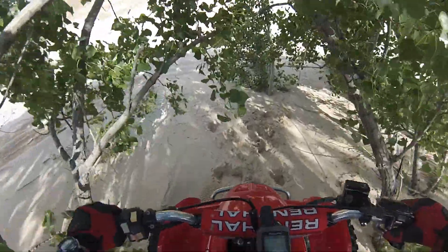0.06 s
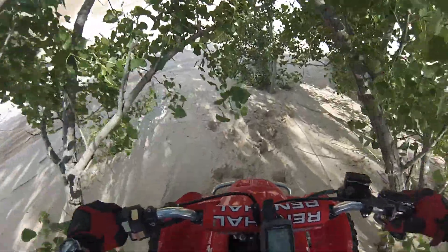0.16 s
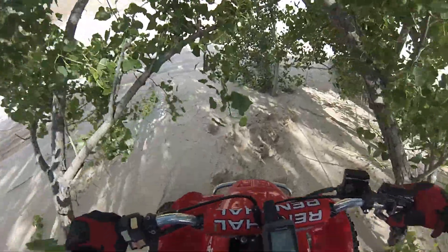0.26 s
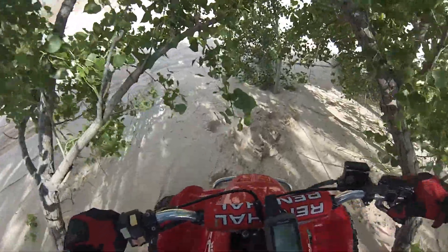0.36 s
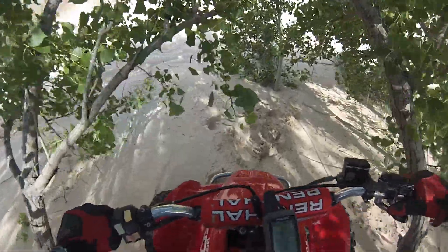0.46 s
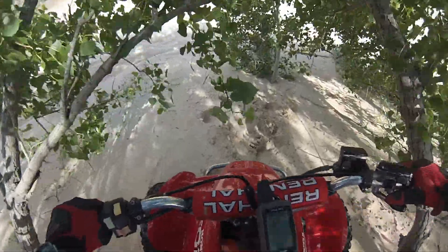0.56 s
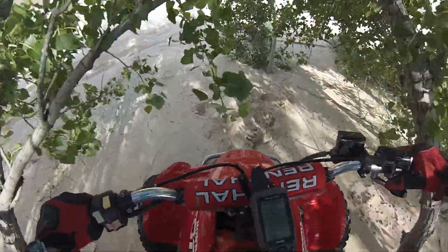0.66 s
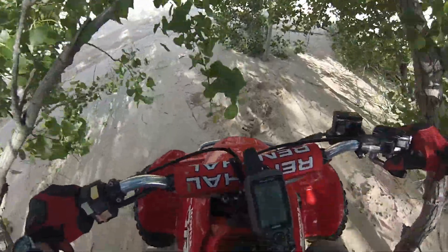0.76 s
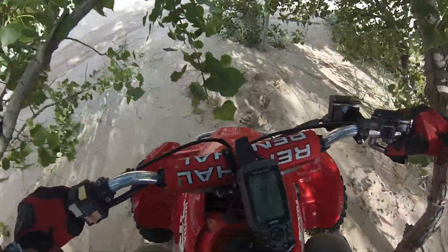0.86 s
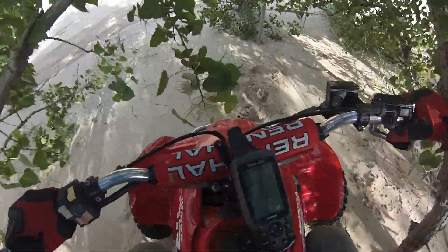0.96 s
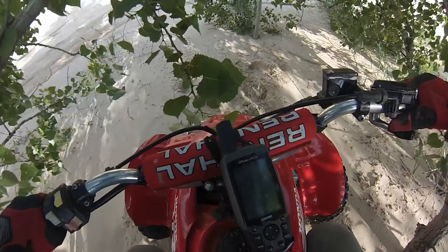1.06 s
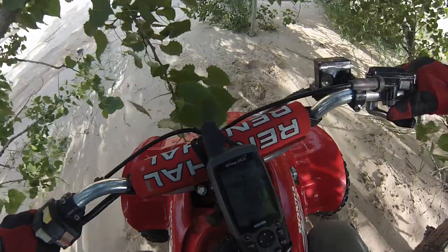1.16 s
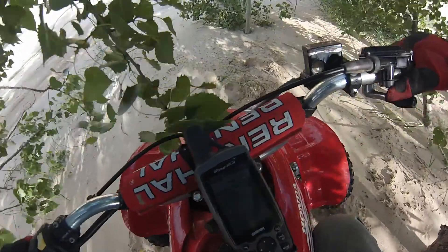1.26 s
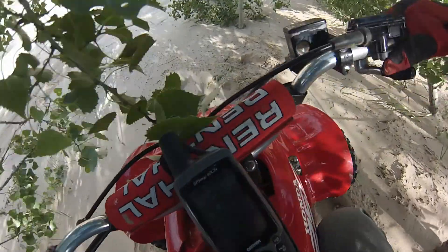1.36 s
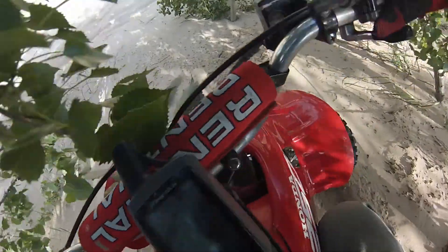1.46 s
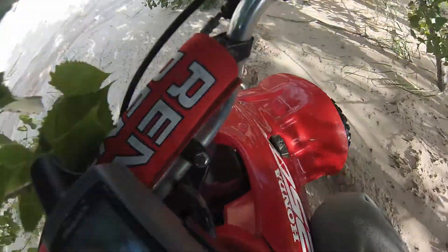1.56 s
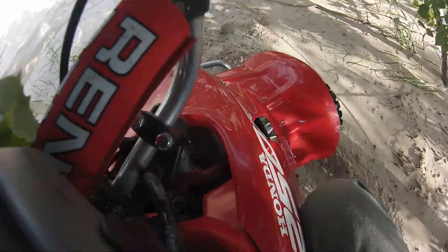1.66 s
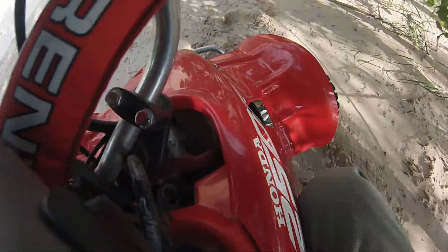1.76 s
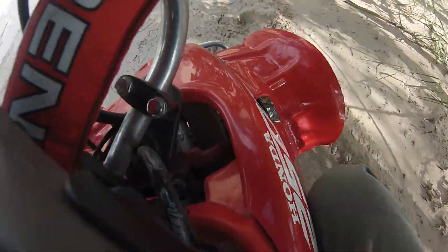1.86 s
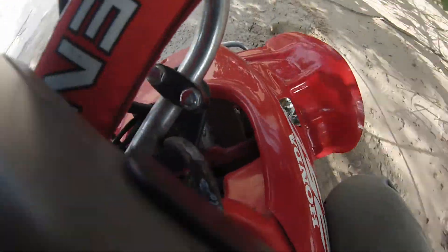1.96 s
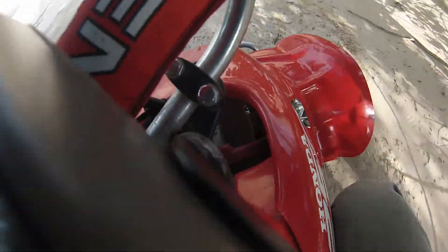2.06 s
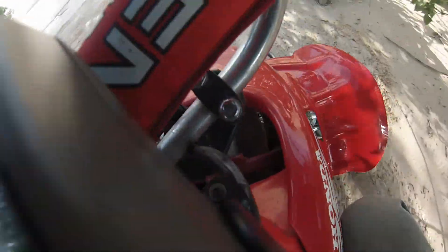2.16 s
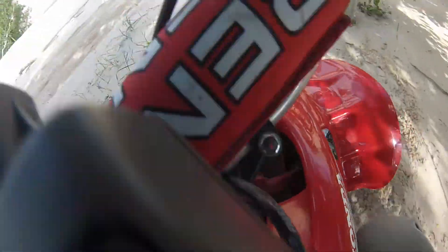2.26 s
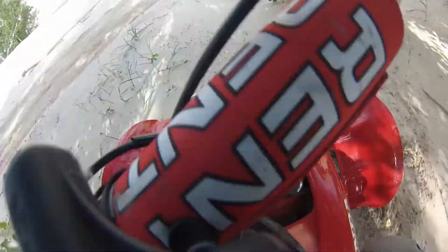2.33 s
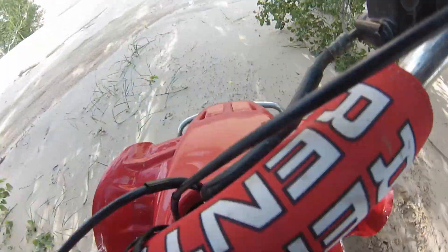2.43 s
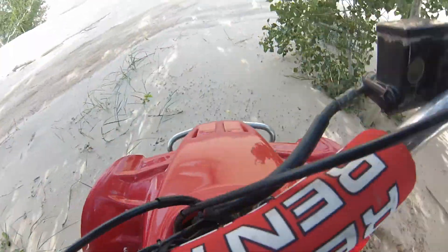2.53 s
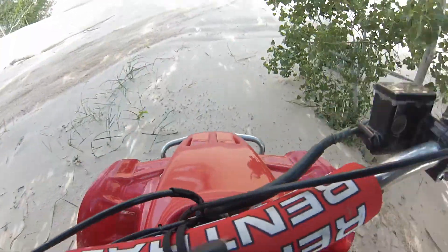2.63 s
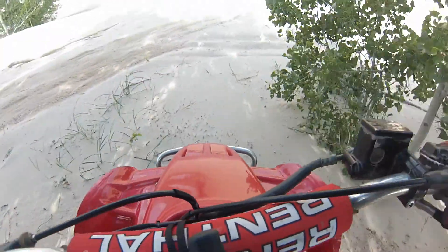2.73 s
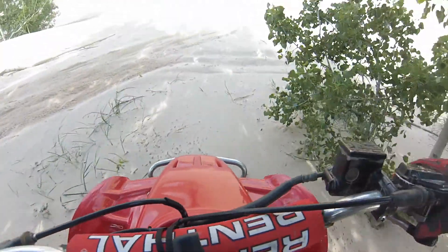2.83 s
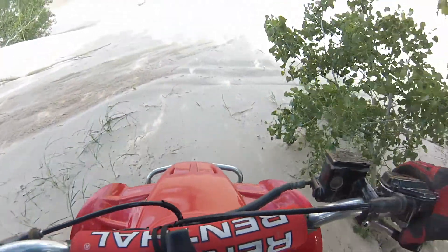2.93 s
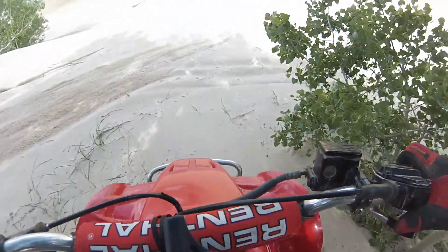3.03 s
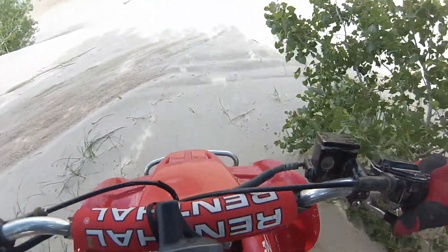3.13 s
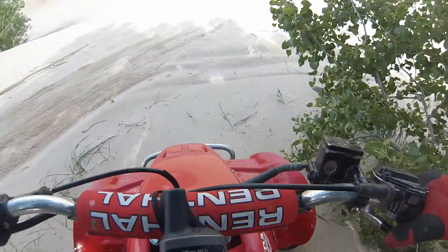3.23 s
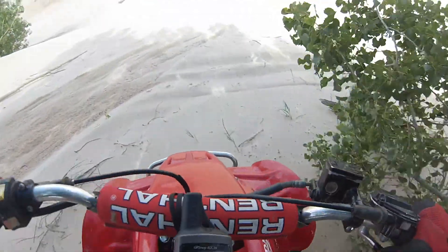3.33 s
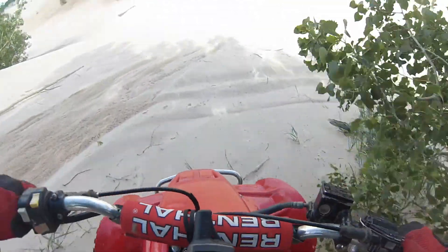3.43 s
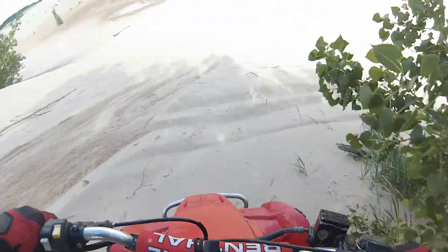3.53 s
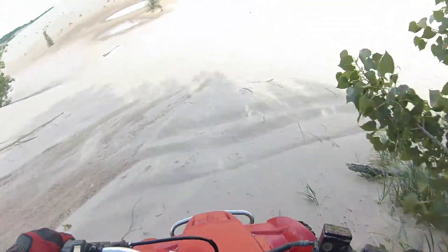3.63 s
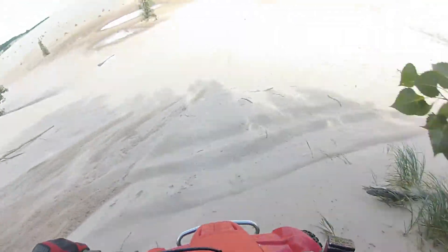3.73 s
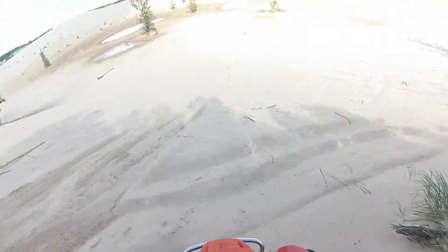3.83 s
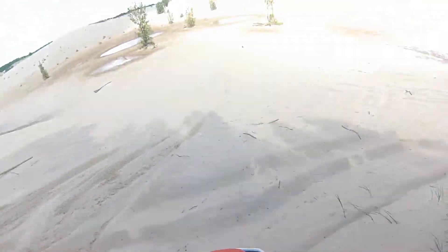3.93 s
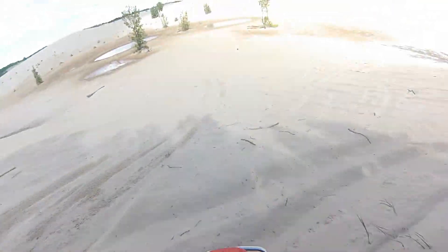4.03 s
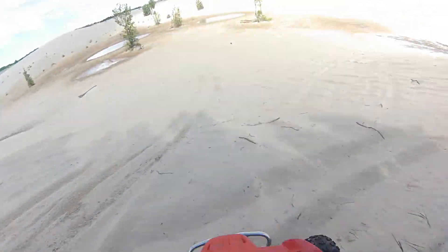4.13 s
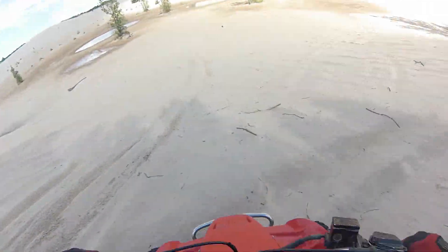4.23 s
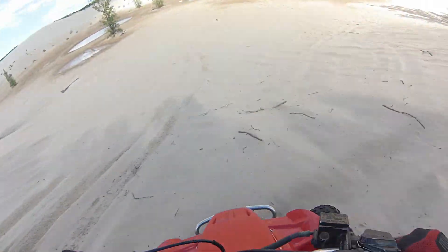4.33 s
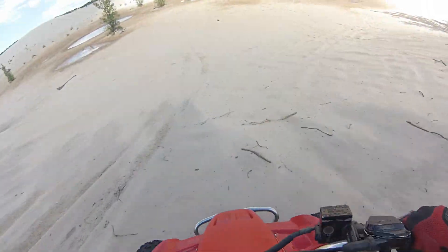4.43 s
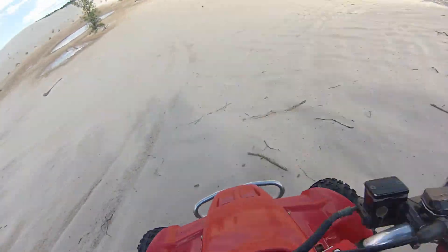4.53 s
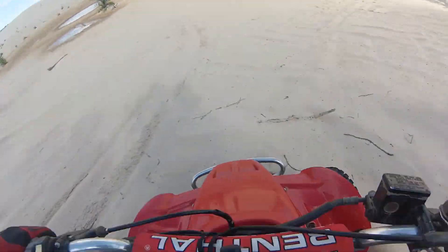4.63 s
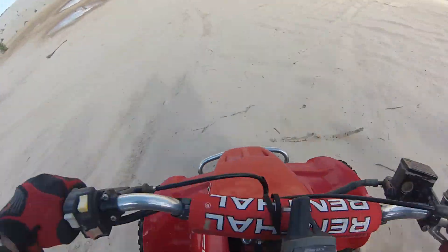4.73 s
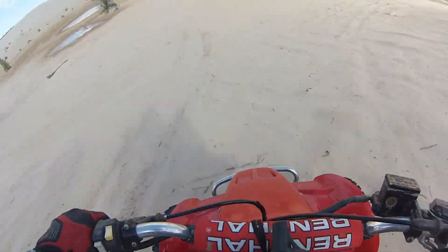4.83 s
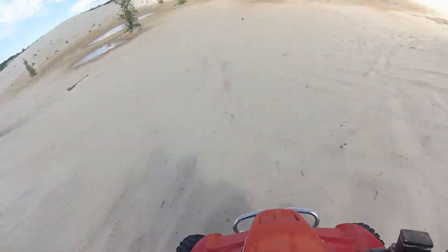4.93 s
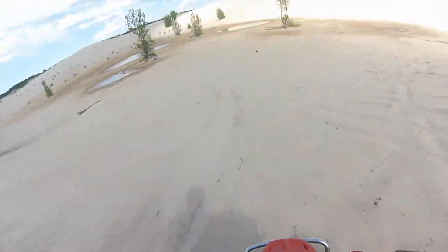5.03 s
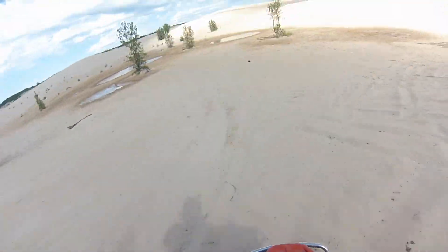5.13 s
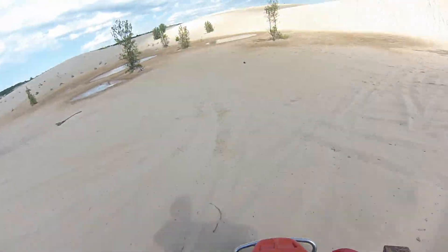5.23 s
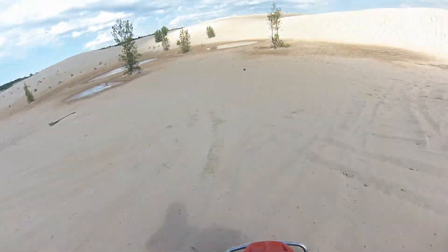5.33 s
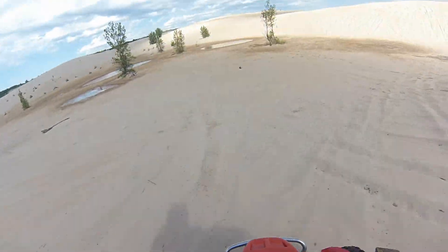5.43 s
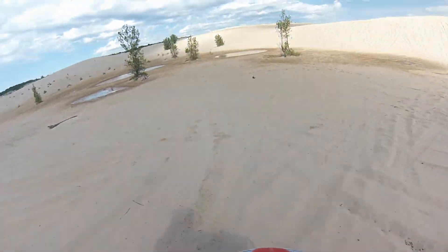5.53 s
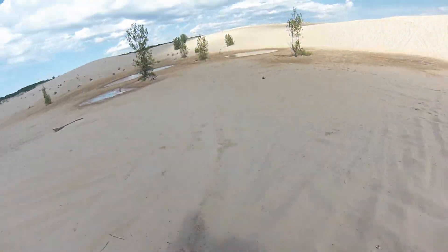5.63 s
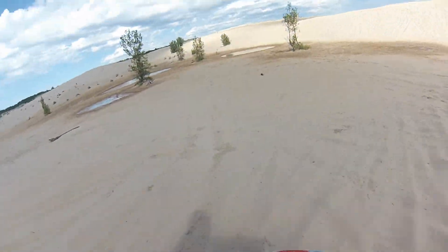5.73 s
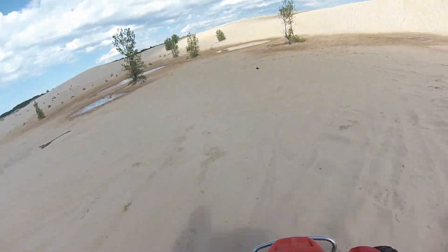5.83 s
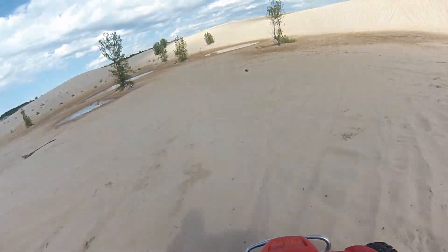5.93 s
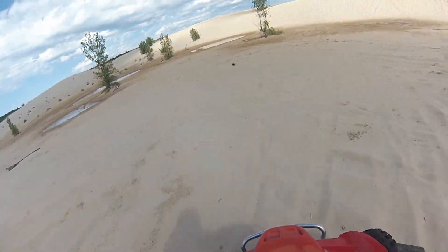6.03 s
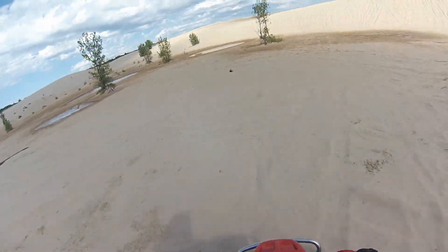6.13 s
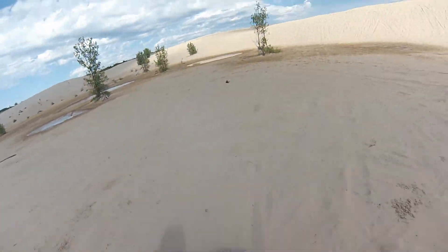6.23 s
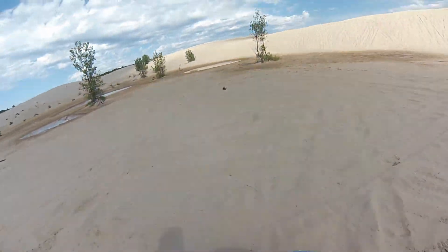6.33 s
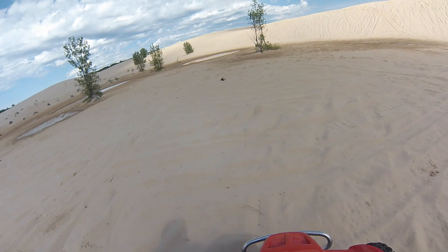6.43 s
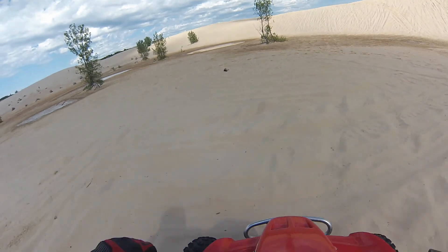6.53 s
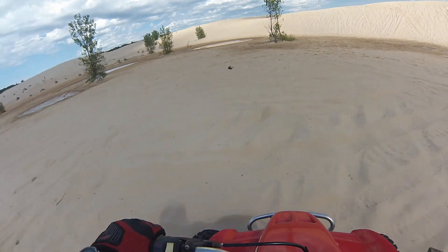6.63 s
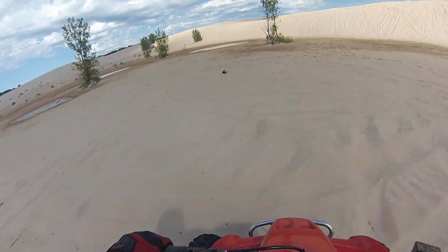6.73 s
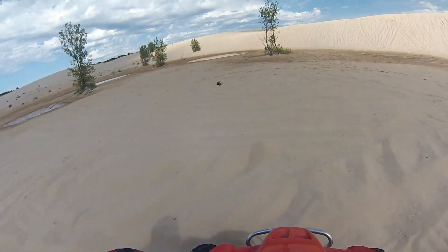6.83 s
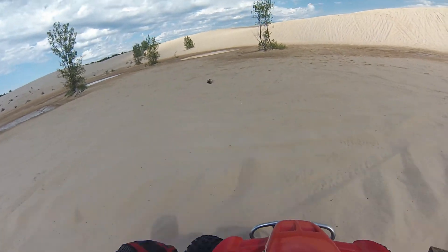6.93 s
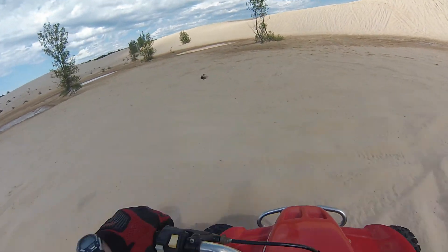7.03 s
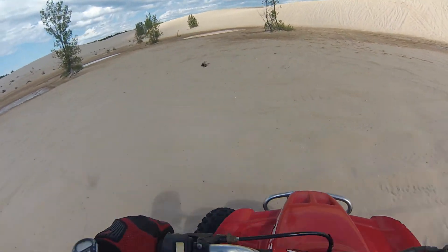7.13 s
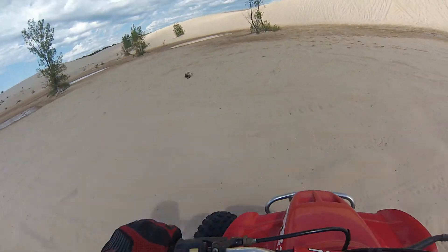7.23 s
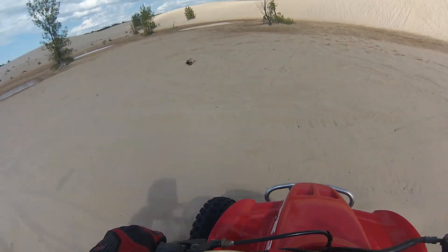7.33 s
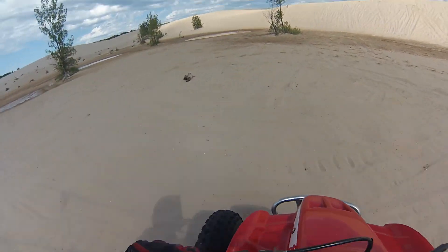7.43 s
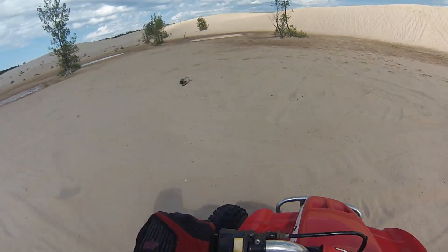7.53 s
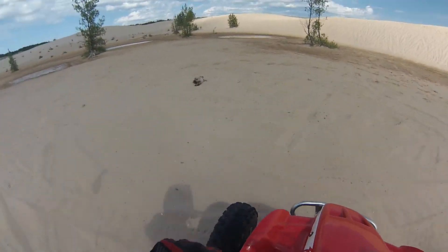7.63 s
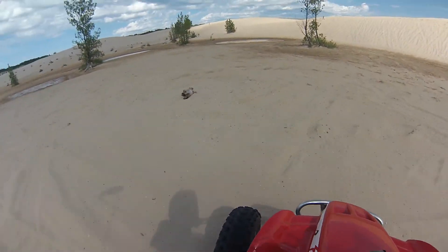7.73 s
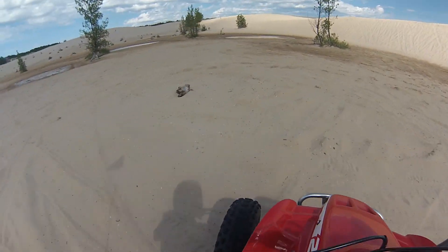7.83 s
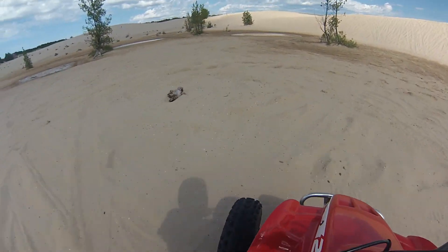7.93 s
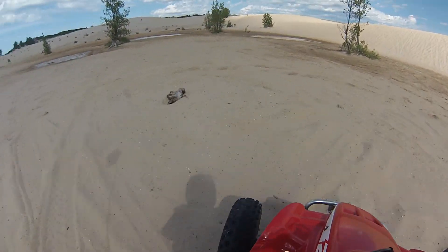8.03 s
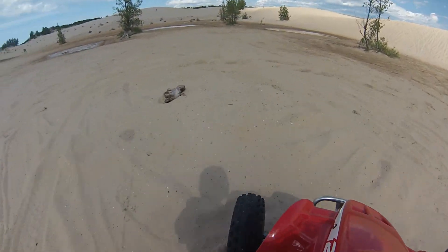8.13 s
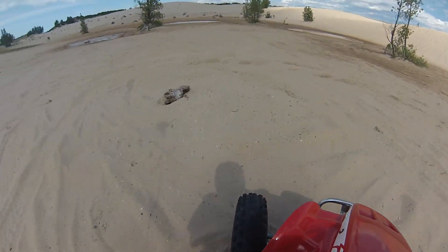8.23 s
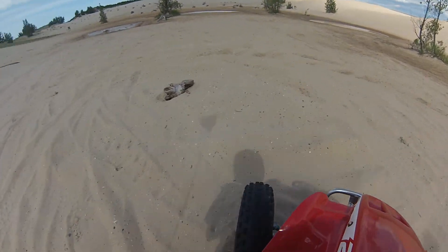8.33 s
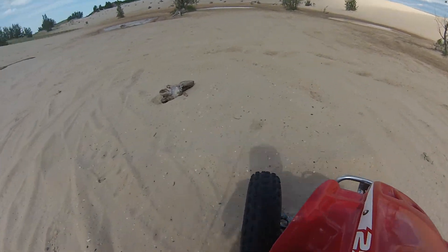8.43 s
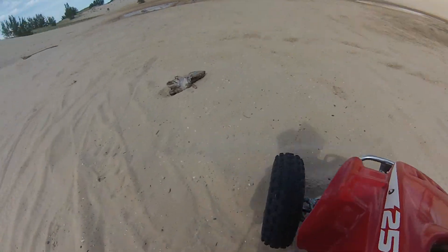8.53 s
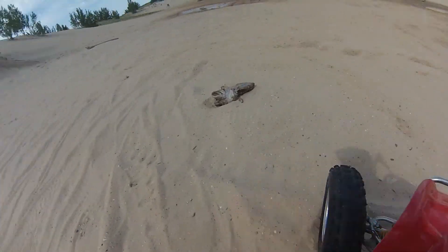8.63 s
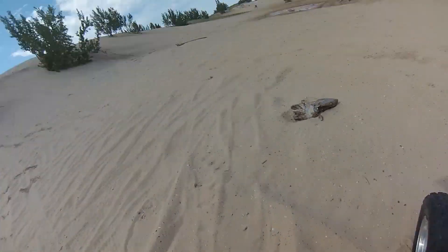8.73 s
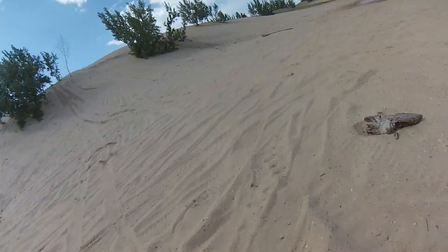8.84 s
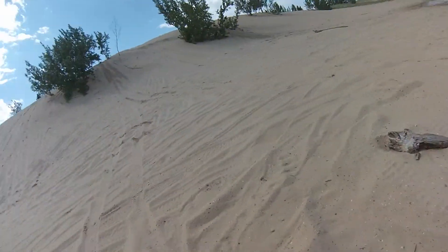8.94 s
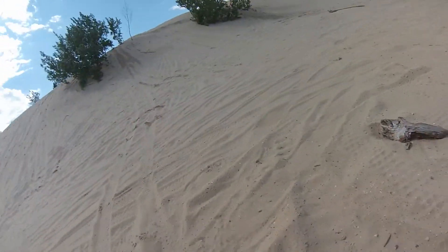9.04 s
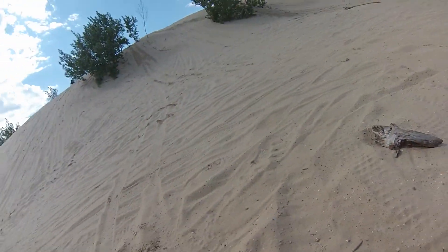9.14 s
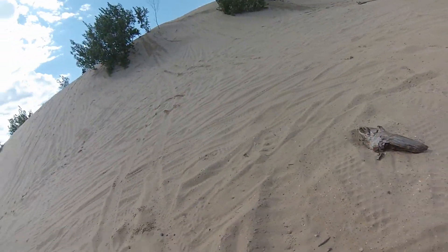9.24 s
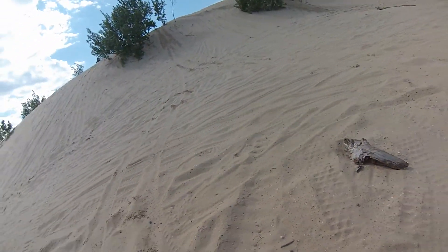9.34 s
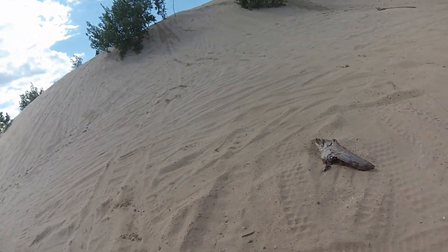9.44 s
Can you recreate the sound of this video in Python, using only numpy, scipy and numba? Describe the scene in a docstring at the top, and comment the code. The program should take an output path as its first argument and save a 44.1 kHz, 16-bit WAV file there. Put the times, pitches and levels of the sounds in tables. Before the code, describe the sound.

A small two-stroke quad idles softly and irregularly, popping and clattering. A heavy knock with juddering rubs and dry scrapes hits the microphone's plastic housing. The engine then climbs to a brief snarling peak, sings down off the throttle, sputters along at middle revs and ends in loud, even, raspy running. Outdoors, wind buffets lowly; the rider-worn microphone sounds close, boxy and self-ducking.

```python
"""Small quad bike on sand

A small two-stroke quad bike idles among trees, then is blipped and driven over sand. The microphone rides on the
rider in a closed plastic housing. Each engine turn sends a puff that rings the pipe and housing; turns that fire
add a thump and a crack. Wind noise buffets the housing, short pulses and gliding noise make knocks, rubs and
scrapes, and the recorder's gain control turns the sound down after loud peaks."""
import sys
import numpy as np
from scipy import signal
from scipy.io import wavfile
from scipy.ndimage import uniform_filter1d
from numba import njit

SR = 44100
rng = np.random.default_rng(int(sys.argv[2]) if len(sys.argv) > 2 else 0)


def bounce(signal):
    """Save signal as a 16-bit WAV file at the path given by the first command-line argument."""
    frames = np.transpose(np.atleast_2d(signal))
    limited = np.clip(frames, -1, 1)
    pcm = np.round(limited * 32767).astype(np.int16)
    wavfile.write(sys.argv[1], SR, pcm)


N = 418068
T = np.arange(N) / SR  # time of each sample [s]

# Levels below are relative: the functions add further gains.
# Engine course: (time [s], crank speed before surges [Hz], puff of each turn [dB], rasp of each turn [dB])
ENGINE_COURSE = [(0, 40.53, -34, -39.5), (.7, 41.46, -34.5, -42.5), (1.6, 40.63, -35, -41),
                 (1.9, 42.9, -38.5, -40.5), (2.4, 42.6, -35, -42), (2.7, 42.63, -34.5, -42.5),
                 (3.0, 42.05, -34, -40), (3.3, 41.23, -34, -42), (3.55, 50.27, -34, -40.5),
                 (3.93, 50.94, -32, -39.5), (4.33, 57.2, -32, -40), (4.62, 65.4, -27, -37.5),
                 (4.88, 69.34, -25, -35.5), (5.07, 75.8, -26.5, -32.5), (5.15, 84.6, -19.5, -20),
                 (5.246, 97.5, -12, -16), (5.27, 100.1, -22, -19.5), (5.292, 98, -26, -17),
                 (5.305, 99.2, -45, -26), (5.35, 94.3, -29, -28), (5.5, 89.15, -70, -26),
                 (5.72, 79.4, -32, -29), (5.81, 77.15, -31, -32.5), (5.99, 69.8, -31.5, -37),
                 (6.34, 73.1, -28.5, -35), (6.6, 77.04, -25, -31), (6.82, 71.15, -30, -34),
                 (7.0, 74.1, -28.5, -33), (7.3, 71.4, -29, -34.5), (7.58, 68.94, -30.5, -34),
                 (8.13, 73.25, -28.5, -33), (8.45, 79.8, -28.5, -32.5), (8.62, 62.3, -33, -37.5),
                 (8.79, 49.55, -41, -36), (8.85, 48.7, -24, -24.5), (9.0, 50.42, -23, -20.5),
                 (9.21, 68.1, -19.5, -17), (9.4, 52.77, -23, -21), (9.48, 52.14, -21.5, -20.5)]
# Turns that fire: (time [s], crack [dB], share with which the next turn fires too [0-1])
FIRING_TURNS = [(0.158, -51, 0.5), (0.303, -45, 0), (0.373, -37, 0.16), (0.4995, -44, 0), (0.692, -47, 0),
                (0.781, -38.5, 0), (0.876, -44, 0.1), (0.9295, -41.5, 0), (0.997, -39.5, 0.8),
                (1.1147, -39.5, 0), (1.211, -36, 0.06), (1.351, -44, 0.2), (1.4507, -44, 0.1),
                (1.5397, -42, 0), (1.586, -44, 0), (1.772, -39, 0.4), (1.819, -41, 0.6), (2.4166, -37, 0.2),
                (2.491, -47, 0.6), (2.599, -47, 0.8), (2.634, -47, 0.1), (2.716, -41, 0.2), (2.852, -46, 0),
                (2.9498, -36, 0.2), (3.0465, -44, 0.1), (3.137, -39.5, 0), (3.28, -34.5, 0.13),
                (3.494, -32.5, 0), (3.543, -31, 0), (3.579, -31.5, 0), (3.723, -31, 1), (3.8012, -26, 0.03),
                (3.88, -27, 0), (3.976, -26, 0), (4.0506, -28, 0), (4.149, -27.5, 0), (4.2173, -29.5, 0),
                (4.2891, -29.5, 0.1), (4.3582, -26.5, 0), (4.41, -27.5, 0.06), (4.46, -27.5, 0),
                (4.509, -26, 0.1), (4.572, -26.5, 0), (4.618, -25, 0.02), (4.664, -24.5, 0.01),
                (4.7102, -26.5, 0.8), (4.771, -24.5, 0.4), (4.827, -28.5, 0.9), (4.8894, -26, 0.46),
                (4.9441, -33, 0), (4.969, -28.5, 0.25), (5.011, -28.5, 0.84), (5.074, -30.5, 0.8),
                (5.116, -31, 0.68), (5.783, -28.5, 0.58), (5.8369, -31, 0.4), (5.877, -33, 0.2),
                (6.006, -34, 0.04), (6.033, -31, 0.75), (6.105, -31.5, 0.9), (6.162, -32, 0.85),
                (6.232, -29.5, 0.1), (6.26, -34, 0), (6.302, -28, 0.02), (6.332, -30.5, 0.6),
                (6.3857, -31.5, 0.95), (6.438, -29.5, 0.03), (6.4758, -28.5, 0.64), (6.542, -28.5, 0.84),
                (6.611, -27, 0.54), (6.677, -28.5, 0), (6.715, -29, 0), (6.755, -28.5, 0),
                (6.782, -34, 0.92), (6.8245, -29, 0.36), (6.8935, -28.5, 0.67), (6.96, -27.5, 0.2),
                (7, -31.5, 0.85), (7.069, -28, 0.66), (7.138, -31, 0.37), (7.166, -28.5, 0),
                (7.2247, -27, 0.6), (7.294, -25, 0.4), (7.3681, -28.5, 0.6), (7.829, -33.5, 0.3),
                (7.9427, -37.5, 1), (8.055, -31.5, 0.1), (8.1533, -29.5, 0.5), (8.275, -31.5, 1),
                (8.355, -29.5, 0.92), (8.4176, -31, 0.7), (8.469, -31, 0.72), (8.536, -31, 0.86),
                (8.5915, -32, 0.97), (8.6444, -29.5, 0.24), (8.695, -28.5, 0.02), (8.733, -30, 0.43),
                (8.7936, -32.5, 0.7)]
# Even running, without misfires: (start [s], end [s], evenness [0-1])
EVEN_STRETCHES = [(5.11, 5.76, .88), (7.5, 8.3, .6), (8.82, 9.6, .95)]
# Throttle shut at speed, when tones start, are full, begin to fade and end: (time [s])
COAST_TIMES = (5.295, 5.332, 5.62, 5.769)
# Tones while the throttle is shut: (multiple of crank speed, level [dB])
COAST_TONES = [(3, -44), (4, -46), (5, -33.5), (6, -62), (7, -47), (8, -55), (9, -53), (10, -54),
               (11, -45.5), (12, -48), (13, -53), (14, -58), (15, -45), (16, -63)]
# Rings that sing while the throttle is shut: (frequency [Hz], width [Hz], level [dB])
COAST_MODES = [(2690, 53, -1), (3650, 94, -11)]
# Main rings of the pipe: (frequency [Hz], width [Hz], level [dB])
PIPE_MODES = [(292, 28.4, -8.5), (424.1, 34, 5), (496.6, 94, -9)]
# Upper rings of the pipe: (frequency [Hz], width [Hz], level [dB])
PIPE_UPPER_MODES = [(625, 20, -5.5), (831, 180, -10), (1000, 710, -12), (1461, 49, -12)]
# Rings under load or at a firing: (frequency [Hz], width [Hz], level [dB])
BARK_MODES = [(1541, 46, 0.5), (2100, 120, -47), (2700, 1350, -20.5), (3120, 156, -7), (2670, 59, -7.5)]
# Low rings under load: (frequency [Hz], width [Hz], level [dB])
LOW_BARK_MODES = [(195, 60, -9), (475, 90, 0), (545, 60, -5)]
# Rings of the plastic housing, the low ones retuned a little: (frequency [Hz], width [Hz], level [dB])
HOUSING_MODES = [(952, 100, -9.5), (1400, 181, -1), (2050, 49, -4), (2285, 280, -8.5), (2675, 80, 0),
                 (3125, 180, -16)]
# Rings of the engine's metal: (frequency [Hz], width [Hz], level [dB])
METAL_MODES = [(3664, 396, 1.5), (4380, 124, 4), (4870, 770, -1.5), (6720, 570, 0), (7720, 640, -4.5),
               (9980, 1800, -13), (11250, 190, -11), (13500, 850, -66)]
# Steady frame vibration: (multiple of crank speed, level [dB])
FRAME_TONES = [(2, -40), (3, -54.5), (4, -58.5), (6, -64)]
# The rider leans and turns, and rings come and go: (time [s], body of the pipe [dB], its upper body [dB],
# ring of the housing [dB], once-a-turn shake of the frame [dB])
RIDER_LEAN = [(0, -15, -16, -2, -57), (1.2, -20, -27, 2, -42), (1.8, 1, -20, -23, -45),
              (2.4, 4, -8, -1, -40), (2.9, 0, -12, 5.5, -41), (3.4, -17, -22, 4, -46),
              (4.2, -28, -23, -15, -44), (5.0, -13.5, -19.5, -8, -45), (5.8, -14, -9, -5, -40),
              (6.6, -16, -17, -11, -34), (7.4, -2, -9, 3, -48), (8.0, -12, -15, -10, -38),
              (8.35, -5, -12, -7, -45), (8.5, -11, -2, -6, -29.5), (8.7, 2, -7, 0, -47),
              (8.85, -7.5, -21, -11, -42), (9.2, -4, -19, -6, -40), (9.48, 0, -24, -8, -41)]
# Knocks on the housing: (time [s], push [dB], signed size of the push and swing, contact time [ms],
# swing of the mount [dB], click [dB])
HOUSING_KNOCKS = [(1.899, 3, 0.99, 0.98, 3.5, 2), (2, -3, 0.51, 4, -25, -46),
                  (2.043, 40, -0.28, 1.65, 13, 8.5), (3.401, -15.5, -0.88, 1.66, -28, -48),
                  (4.157, -30, -0.83, 0.76, -29, -20), (5.704, -50, 0.75, 0.4, -52, -28),
                  (6.389, -14, 0.67, 2.1, -39, -30), (6.874, -44, 0.99, 0.34, -58, -18.5),
                  (7.266, -56, 0.89, 0.694, -50, -44), (7.434, 14, 0.27, 6.3, 1.5, -24),
                  (7.538, -62, 1, 1.2, -70, -23), (7.89, -46, 1, 0.64, -65, -31),
                  (9.041, 10, 0.066, 2.7, 12.5, -15)]
# Swing of the mount after a knock: (frequency [Hz], level [dB], time to fall by 60 dB [s])
MOUNT_MODES = [(65.4, 6.5, 0.36), (99, -32, 0.5), (182.3, 3, 0.14), (41, -11.5, 0.9)]
# Rings of the shell after a knock: (frequency [Hz], width [Hz], level [dB])
SHELL_MODES = [(950, 133, 6.5), (1470, 43, -1), (2320, 150, 5.5), (1900, 1200, -2)]
# Rubbing on the housing: (start [s], length [s], judder [dB], judder rate [Hz], scrape relative to judder [dB])
HOUSING_RUBS = [(1.606, 0.042, -23, 114, -35), (1.647, 0.069, -23.5, 108.4, -23),
                (2.055, 0.062, 0, 117.1, -31.5), (2.123, 0.1, -2, 128, -29.5),
                (2.216, 0.068, -1.5, 124, -28.5), (3.385, 0.087, -22.5, 108.4, -30),
                (9.031, 0.038, -13.5, 108.3, -40)]
# Dry scrapes on the shell: (start [s], length [s], level [dB], pitch [Hz], end pitch [Hz], width [Hz])
SHELL_SCRAPES = [(1.619, 0.016, -38.5, 1260, 980, 500), (1.668, 0.034, -38.5, 960, 1100, 700),
                 (1.713, 0.016, -42, 1010, 990, 600), (2.135, 0.041, -27.5, 2050, 2050, 160),
                 (2.18, .04, -35, 2070, 2050, 195), (2.212, 0.04, -31, 2120, 2060, 140),
                 (2.243, 0.04, -23.5, 2116, 2260, 262), (3.395, 0.0094, -31, 1080, 920, 343),
                 (3.405, 0.049, -38.5, 1160, 1300, 500), (3.461, 0.03, -44.5, 2240, 2400, 400)]
# Bands within a scrape: (multiple of the pitch, level [dB])
SCRAPE_BANDS = [(.66, -3), (1, 2.5), (1.72, -7.5)]
# Wind: (time [s], buffeting [dB], slow heave relative to it [dB])
WIND_COURSE = [(0, -31, -10), (.7, -35, -9), (1.4, -32.5, -6), (1.75, -31, 0.5), (2.0, -10.5, -8),
               (2.1, 6, 3), (2.35, -21, -6), (2.8, -32.5, 0), (3.2, -30.5, -6), (3.7, -25.5, -10),
               (4.2, -36, 7), (4.4, -23, 3), (4.8, -19.5, -3.5), (5.1, -30.5, 0), (5.4, -25, -3.5),
               (5.75, -21.5, 0.5), (6.1, -25, 3), (6.4, -28, 2.5), (6.9, -23.5, -1), (7.3, -18.5, 3.5),
               (7.6, -27, 7), (7.9, -27.5, 3.5), (8.12, -24, 8.5), (8.3, -31.5, 6.5), (8.5, -24, -0.5),
               (8.9, -30.5, -6.5), (9.15, -24, -2.5), (9.48, -27, -10)]

USUAL_EVENNESS, EVEN_OUT_S = .47, .08
SURGE_SHARE, SURGE_T60_S = 0.03, 0.39  # each firing speeds the crank up, drag takes it back
# the intake gulp is largest at idle speed and dies out as the crank speeds up
IDLE_HZ, MOST_GULP, GULP_ENDS_HZ = 37.9, 0.71, 47
# clatter level at idle, growth with crank speed, growth per dB of rasp
CLATTER_DB, CLATTER_DB_PER_HZ, CLATTER_PER_RASP = -44.5, 0.1812, 0.44
THUMP_DB, THUMP_PER_CRACK = -20, 0.56  # relative thump of a -23.5 dB crack; growth with the crack
AGAIN_THUMP = .6  # a weak second firing still thumps: power of its share
JITTER_S, RASP_SCATTER_DB = .00012, 5.5  # scale of turn-to-turn scatter, smaller in even running
ECHO_S, ECHO_DB = 0.002173, (-6, -15, -6.5, -27)  # the snap runs to and fro in the pipe
TUNING_SPREAD, TUNED_BELOW_HZ = .04, 1800  # the housing's low modes ring from 2 % flat to 2 % sharp
RUB_ATTACK_S, RUB_RELEASE_S = 0.025, 0.018
SCRAPE_EDGE_S, SCRAPE_GRAIN_DB = 0.00245, 2
CLICK_TOP_HZ = 3300
GAIN_TOP_DB, GAIN_RATIO, GAIN_ATTACK_S, GAIN_RELEASE_S = -14.5, 19, 0.0079, 0.062
CLIP_KNEE, TOP_HZ = 8.4, 15500


def undb(db):
    """Turn decibels into a plain factor."""
    return 10 ** (np.asarray(db) / 20)


def unit(x):
    """Scale a sound to an average (RMS) level of 1."""
    return x / np.sqrt(np.mean(x ** 2))


def noise():
    """Plain hiss with all pitches in it."""
    return rng.standard_normal(N)


def curve(table):
    """Columns of a table after its times, drawn out to one value a sample."""
    s, *columns = np.transpose(table)
    return [np.interp(T, s, c) for c in columns]


def band(x, hz, width):
    """Resonance with gain 1 at the centre."""
    return signal.lfilter(*signal.iirpeak(hz, hz / width, fs=SR), x)


def steep_band(x, hz, width):
    """Two resonances in a row, the second twice as wide."""
    return band(band(x, hz, width), hz, 2 * width)


def above(x, hz, order=3):
    """Keep the pitches above a limit."""
    return signal.sosfilt(signal.butter(order, hz, "high", fs=SR, output="sos"), x)


def below(x, hz, order):
    """Keep the pitches below a limit."""
    return signal.sosfilt(signal.butter(order, hz, fs=SR, output="sos"), x)


def ring(x, modes):
    """Sum of resonances, neighbours in opposite phase."""
    return sum((-1) ** k * undb(db) * band(x, hz, width) for k, (hz, width, db) in enumerate(modes))


def tone(turns):
    """Steady sine with an average (RMS) level of 1."""
    return np.sqrt(2) * np.sin(2 * np.pi * turns)


def clicks(times, sizes):
    """Pulses, each shared between two samples to place it finely."""
    out, at = np.zeros(N + 2), np.clip(times * SR, 0, N)
    np.add.at(out, at.astype(int), sizes * (1 - at % 1))
    np.add.at(out, at.astype(int) + 1, sizes * (at % 1))
    return out[:N]


def fade(x, t60):
    """Each pulse becomes a step that falls by 60 dB in t60 seconds."""
    return signal.lfilter([1], [1, -np.exp(-np.log(1000) / (t60 * SR))], x)


def wraps(turns):
    """Times at which a rising count of turns passes a whole number."""
    return np.interp(np.arange(np.ceil(turns[0]), turns[-1]), turns, T)


@njit
def follow(x, attack, release):
    """Peak level that rises fast and falls slowly."""
    out, e = np.empty(len(x)), 0.
    for i in range(len(x)):
        e += (abs(x[i]) - e) * (attack if abs(x[i]) > e else release)
        out[i] = e
    return out


def engine():
    """Every turn the port opens and rings the pipe; a turn that fires adds a thump and a crack of hot gas."""
    hz, puff_db, rasp_db = curve(ENGINE_COURSE)
    s, crack_db, again = np.transpose(FIRING_TURNS)
    even = USUAL_EVENNESS + sum((e - USUAL_EVENNESS) * (T > start) * (T < end)
                                for start, end, e in EVEN_STRETCHES)
    even = uniform_filter1d(even, size=int(EVEN_OUT_S * SR))
    gulp = MOST_GULP * np.clip((GULP_ENDS_HZ - hz) / (GULP_ENDS_HZ - IDLE_HZ), 0, 1)
    gulp = gulp * np.minimum(2 - 2 * even, 1)
    clatter_db = CLATTER_DB + CLATTER_DB_PER_HZ * (hz - IDLE_HZ) + CLATTER_PER_RASP * (rasp_db - rasp_db[0])
    coast = np.interp(T, COAST_TIMES, [0, 1, 1, 0])
    # even running counts as load, except around the shut throttle
    load = np.clip((even - .62) / .3, 0, 1)
    load = load * (np.abs(T - np.mean(COAST_TIMES)) > np.ptp(COAST_TIMES) / 2)

    kick = fade(clicks(s, np.ones(len(s))), t60=SURGE_T60_S)
    surge = uniform_filter1d(kick - uniform_filter1d(kick, size=SR // 5), size=SR // 50)
    hz = hz * (1 + SURGE_SHARE * surge)
    spin = np.cumsum(hz) / SR
    # the crank angle is shifted so that firings fall close to whole turns
    lead = np.interp(T, s, np.unwrap(np.interp(s, T, spin), period=1))
    turns = spin - uniform_filter1d(lead, size=SR // 2, mode="nearest")
    times = wraps(turns)
    chance = rng.standard_normal((3, len(times))) * (1.1 - np.interp(times, T, even))

    # first firings, followed by the weaker firings one turn later
    fired = np.r_[s, s + 1 / np.interp(s, T, hz)]
    share = np.r_[np.ones(len(s)), np.abs(again)]
    crack = share * np.tile(undb(crack_db), 2)
    thump_db = THUMP_DB + THUMP_PER_CRACK * (crack_db + 23.5)
    thump = share ** AGAIN_THUMP * np.tile(undb(thump_db), 2)
    puff = undb(np.interp(times, T, puff_db) + 3.2 * chance[0] + 19.5)
    puff = puff * np.sqrt(SR / np.interp(times, T, hz))
    nearest = np.abs(times[:, None] - s).argmin(axis=0)
    blow = undb(43.5) * thump + np.r_[puff[nearest], 0 * s]
    puff[nearest] = 0  # a first firing takes the place of that turn's puff

    strokes = clicks(times + 0.002295, puff) + clicks(fired + 0.002057, blow)
    # on a closed throttle the intake gulps half a turn later
    half_turn = .5 / np.interp(fired, T, hz)
    strokes = strokes + clicks(fired + 0.00198 + half_turn, blow * np.interp(fired, T, gulp))
    half_turn = .5 / np.interp(times, T, hz)
    strokes = strokes + clicks(times + 0.00217 + half_turn, puff * np.interp(times, T, gulp))
    stream = undb(puff_db - 14 * even ** 2 + 14.5) * noise()  # gas streaming between the puffs

    # each puff leaves with a snap and a short turbulent burst; uneven running smears them into a drone
    rasp_sizes_db = np.interp(times, T, rasp_db) + RASP_SCATTER_DB * chance[1]
    rasp = undb(rasp_sizes_db + 4.5 * np.interp(times, T, even) + 4.5)
    puffs = clicks(times + 0.001587 + JITTER_S * chance[2], rasp)
    puffs = puffs + clicks(fired + 0.001957, undb(18) * crack)
    snap = pipe_echoes(puffs)
    swirl = fade(puffs, t60=0.068) * (1 - even) + undb(-4) * fade(puffs, t60=0.022) * even
    swirl = swirl * noise()
    burst = swirl * undb(2 - 10 * load) + undb(10 * load + 15) * snap
    drone = undb(rasp_db - 12 * even ** 2 - 4 * load - 3 * coast + 16) * noise()
    # the drone swells a fifth of a turn after each whole turn, most under load
    pulse_db = 5 * (0.14 + 0.4 * load) * np.cos(2 * np.pi * (turns - .2))
    ticks = undb(29) * coast * band(clicks(times, rasp), 2300, 3000)  # dry tick of each turn
    air = burst + drone * undb(pulse_db) + ticks

    sound = pipe_body(strokes, stream, load, coast, fired, thump)
    sound = sound + bark(snap, swirl, strokes, load, fired, crack)
    sound = sound + housing(air, coast * drone) + metal(clatter_db, turns, fired, crack)
    return sound + frame_shake(turns, fired, thump) + coast_tones(turns, coast)


def pipe_body(strokes, stream, load, coast, fired, thump):
    """Puffs and streaming gas set the air in the pipe ringing at its own pitches."""
    body_db, upper_db, _, _ = curve(RIDER_LEAN)
    pipe = above(ring(band(strokes + stream, 225, 550), PIPE_MODES), 301) * undb(-9 * load)
    pipe = pipe + undb(body_db - 11.5) * steep_band(strokes, 563, 150)
    pipe = below(pipe, 640, order=3)
    pipe = pipe + undb(upper_db - 11) * steep_band(strokes, 697, 125)
    # load and firings drive the upper modes
    drive = undb(3.6 * load - 16) * (strokes + stream) + undb(8) * coast * stream
    drive = drive + undb(9) * fade(clicks(fired, thump), t60=0.18) * noise()
    return pipe + above(ring(drive, PIPE_UPPER_MODES), 283)


def pipe_echoes(pulses):
    """A snap runs to and fro in the pipe, so each pulse repeats at fixed delays."""
    repeats = sum(undb(db) * np.roll(pulses, int(k * ECHO_S * SR)) for k, db in enumerate(ECHO_DB))
    return band(band(repeats, 1100, 4200), 1100, 4200)


def bark(snap, swirl, strokes, load, fired, crack):
    """Snaps and bursts excite sharp rings under load; lone firings bark too."""
    loaded = undb(3) * ring(load * (undb(24) * snap + undb(-13) * swirl), BARK_MODES)
    low = undb(-9) * ring(load * band(strokes, 260, 310), LOW_BARK_MODES)
    lone = undb(44) * ring(pipe_echoes(clicks(fired + 0.00199, crack)), BARK_MODES)
    return loaded + low + lone


def housing(air, coast_drone):
    """The exhaust noise rings the plastic shell, whose low modes waver between sharp and flat."""
    waver = unit(band(band(noise(), 10.5, 20), 10.5, 20))
    angle = np.pi / 4 * (1 + np.tanh(waver))

    def tuned(share):
        """Ring the shell with its low modes shifted by a share of their pitch."""
        return ring(air, [(f * (1 + share * (f < TUNED_BELOW_HZ)), width, db) for f, width, db in HOUSING_MODES])

    shell = np.sin(angle) ** 2 * tuned(TUNING_SPREAD / 2) + np.cos(angle) ** 2 * tuned(-TUNING_SPREAD / 2)
    shell = shell + ring(coast_drone, COAST_MODES)
    ring_db = curve(RIDER_LEAN)[2]
    shell = shell + undb(ring_db) * band(air, 1262, 74)
    return above(shell, 910)


def metal(clatter_db, turns, fired, crack):
    """Hot gas and clatter, both made of noise, ring the engine's metal parts."""
    gas = fade(clicks(fired, undb(1) * crack), t60=0.11) + fade(clicks(fired, undb(-13.5) * crack), t60=0.086)
    gas = band(band(gas, 1.45, 800), 1.45, 800) * noise()
    clatter = undb(clatter_db) * (1 + 0.22 * np.cos(2 * np.pi * turns)) * noise()
    parts = ring(gas + band(band(clatter, 3260, 4800), 3700, 13000), METAL_MODES)
    parts = parts + undb(-26.5) * band(gas + undb(-9) * clatter, 10000, 2700)
    hiss = undb(-37) * above(band(clatter, 11400, 5000), 10300)  # the clatter's steady top
    return above(parts, 4220) + hiss


def frame_shake(turns, fired, thump):
    """The frame shakes at multiples of the crank speed, and each firing jolts it."""
    rock_db = curve(RIDER_LEAN)[3]
    shake = sum(undb(db) * tone(k * turns) for k, db in FRAME_TONES) + undb(rock_db) * tone(turns)
    return shake + undb(33) * steep_band(clicks(fired + .002, thump), 140, 137)


def coast_tones(turns, coast):
    """With the throttle shut at speed, flickering tones at multiples of the crank speed swell, hold and fade."""
    out = 0
    for k, db in COAST_TONES:
        flicker_db = 2 * unit(band(band(noise(), 9, 26.3), 11, 28))
        out = out + undb(db + flicker_db) * np.sqrt(2) * np.sin(2 * np.pi * k * turns + k * k) * coast
    return out


def knocks():
    """A blow pushes the housing and lets it rebound, the mount swings out and the shell clicks."""
    out, t = np.zeros(N + SR), np.arange(SR // 4) / SR
    swing = sum(undb(db) * np.sin(2 * np.pi * hz * t) * 1000 ** (-t / t60) for hz, db, t60 in MOUNT_MODES) / 2
    tap = 1. * (t == 0)
    for s, push_db, sign, ms, swing_db, click_db in HOUSING_KNOCKS:
        contacts = t * 1000 / ms  # time counted in contact times
        push = np.sin(np.pi * contacts) * np.minimum(contacts / 0.27, 1) * np.exp(-.45 * contacts)
        rattle = rng.standard_normal(len(t)) * (1000 ** (-t / 0.015) + undb(-13) * 1000 ** (-t / 0.08))
        click = ring(8 * tap + rattle, SHELL_MODES)
        click = click + undb(8) * band(tap, 1900, 3300)  # the bare contact
        click = below(click, CLICK_TOP_HZ, order=4)
        # bright grit shaken loose by the knock
        grit = band(above(rng.standard_normal(len(t)), CLICK_TOP_HZ), 5000, 6000) * 1000 ** (-t / .05)
        click = click + undb(-40) * grit
        at = int(s * SR)
        out[at:at + len(t)] += sign * (undb(push_db) * push + undb(swing_db) * swing)
        out[at:at + len(t)] += undb(click_db + 8.5) * click
    return out[:N]


def rubs():
    """Stick and slip: uneven tugs shake the mount, a dry scrape goes with each."""
    out = 0
    for s, length, db, hz, scrape_db in HOUSING_RUBS:
        on = np.interp(T - s, [0, RUB_ATTACK_S, length, length + RUB_RELEASE_S], [0, 1, 1, 0])
        times = wraps(hz * T)
        chance = rng.standard_normal((2, len(times)))
        tugs = clicks(times + 0.00097 * chance[0], undb(2.3 * chance[1]))
        # modes: (frequency [Hz], width [Hz], level [dB])
        judder = ring(tugs, [(80, 20, 9.5), (128, 94, 1.5), (248.5, 35.4, -2), (343, 16, -7)])
        judder = unit(band(judder, 93, 320))
        grains = fade(tugs, t60=0.038) * noise()
        scrape = unit(ring(grains, [(2360, 520, 3.9), (1360, 60, 13), (3160, 1400, 1.3), (860, 84, 3.8)]))
        out = out + on * undb(db) * (judder + undb(scrape_db) * scrape)
    return out


def scrapes():
    """Dry scrapes on the shell: grainy noise in three gliding bands."""
    out = np.zeros(N)
    for s, length, db, hz, end_hz, width in SHELL_SCRAPES:
        t = np.arange(int((length + SCRAPE_EDGE_S) * SR)) / SR
        chance = rng.standard_normal((4, 8192))

        def soft(x, cut):
            """Slowed-down noise, the last stretch of it."""
            return unit(below(x, cut, order=2))[-len(t):]

        phase = 2 * np.pi * np.cumsum(hz + (end_hz - hz) * t / length) / SR
        bands = sum(undb(d) * soft(c, width / 2) * np.cos(k * phase)
                    for (k, d), c in zip(SCRAPE_BANDS, chance))
        on = np.interp(t, [0, SCRAPE_EDGE_S, length, length + SCRAPE_EDGE_S], [0, 1, 1, 0])
        grain_db = SCRAPE_GRAIN_DB * soft(chance[3], 130)
        out[int(s * SR):][:len(t)] += on * bands * undb(db + grain_db)
    return out


def wind():
    """Slow pressure swings on the housing, falling steeply with pitch and coming in gusts."""
    wind_db, heave_db = curve(WIND_COURSE)
    heave = undb(heave_db) * unit(band(band(noise(), 12.2, 9.3), 8.3, 24.4))
    rumble = undb(-8.5) * unit(band(band(noise(), 30, 32.5), 32, 65))
    flutter = undb(-20) * unit(band(band(noise(), 62, 110), 80, 170))
    gusts = undb(2 * unit(band(band(noise(), 2.37, 4.8), 2.37, 4.8)))
    return undb(wind_db) * gusts * (above(heave + rumble, 6, order=1) + flutter)


def scene():
    """All sources added together in one channel."""
    return (engine() + knocks() + rubs() + scrapes() + wind())[None]


def record(dry):
    """Gain control ducks after peaks, the loudest knocks are rounded off at full scale, the top is cut."""
    peak = follow(dry[0], 1 / (GAIN_ATTACK_S * SR), 1 / (GAIN_RELEASE_S * SR))
    gain = np.minimum(1, undb(GAIN_TOP_DB) / (peak + 1e-9)) ** (1 - 1 / GAIN_RATIO)
    level = gain * dry
    rounded = level / (1 + np.abs(level) ** CLIP_KNEE) ** (1 / CLIP_KNEE)
    return signal.sosfilt(signal.ellip(8, .2, 70, TOP_HZ, fs=SR, output="sos"), rounded)


dry = scene()
out = record(dry)
bounce(out)
```